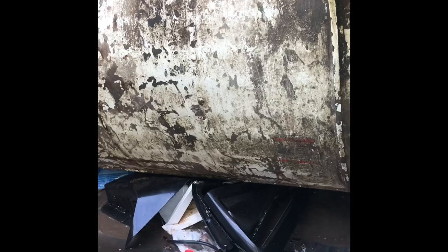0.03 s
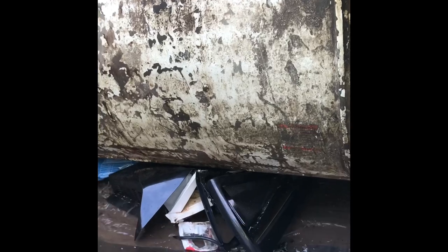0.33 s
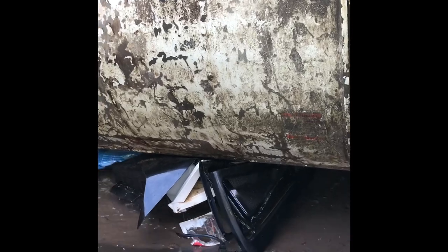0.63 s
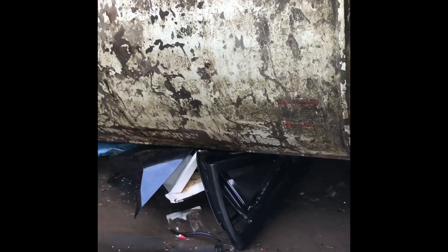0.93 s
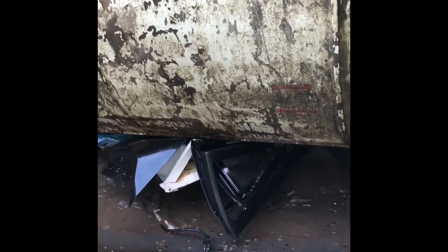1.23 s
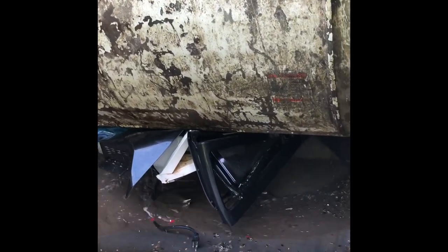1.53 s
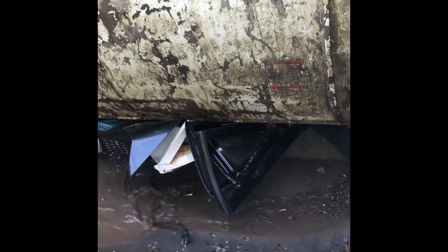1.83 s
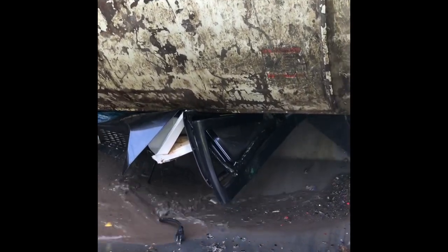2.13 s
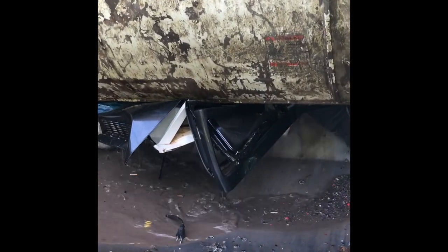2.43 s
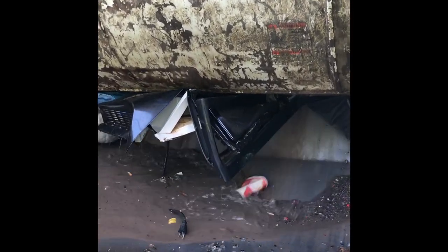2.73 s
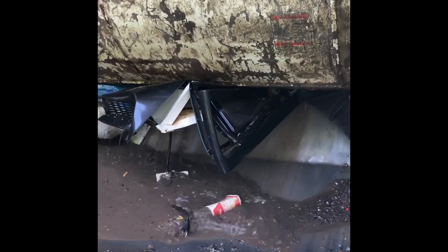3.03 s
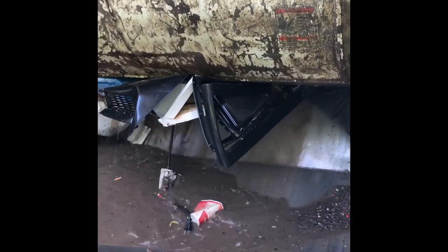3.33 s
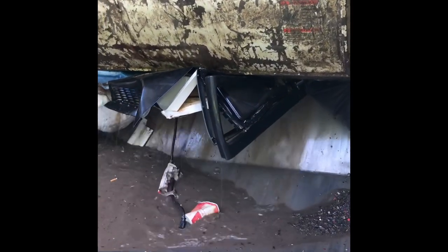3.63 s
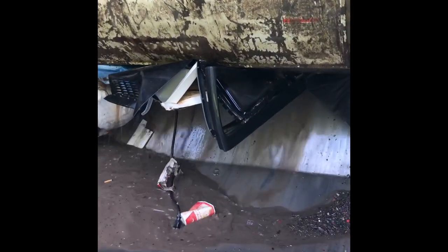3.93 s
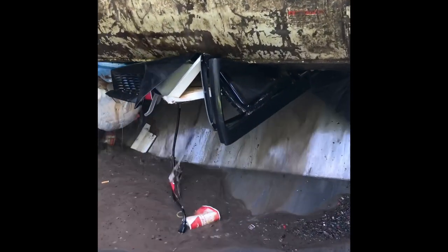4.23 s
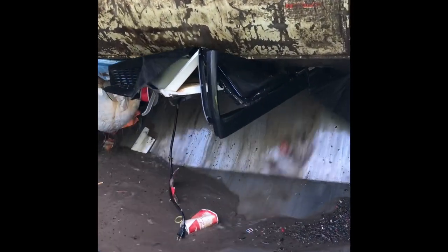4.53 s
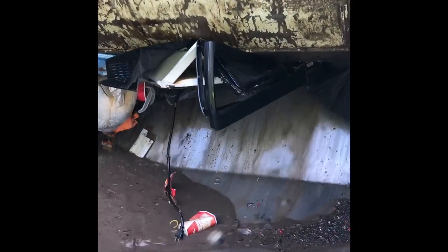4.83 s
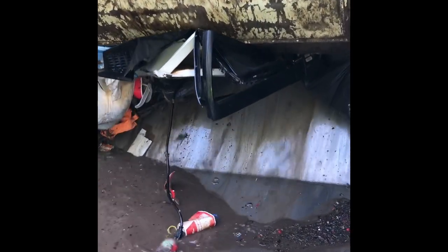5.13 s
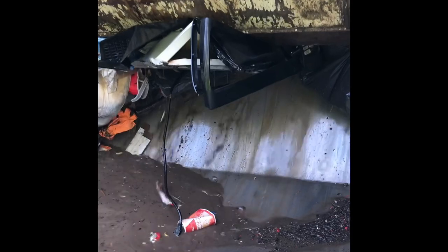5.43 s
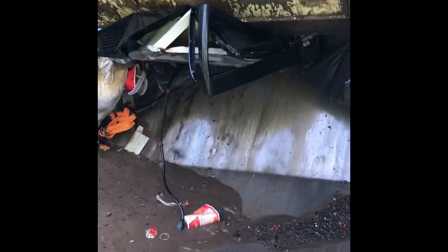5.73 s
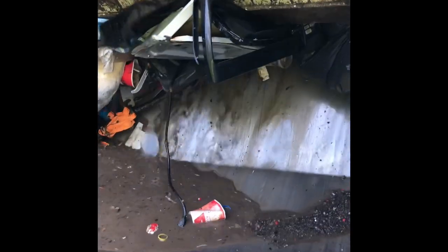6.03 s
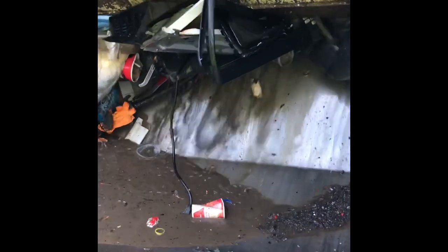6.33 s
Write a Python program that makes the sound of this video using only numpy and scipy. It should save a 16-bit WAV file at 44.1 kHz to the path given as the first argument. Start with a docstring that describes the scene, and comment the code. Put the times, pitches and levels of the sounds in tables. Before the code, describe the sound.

A garbage truck idles, then revs with a hydraulic whine as its compactor crushes junk in two loud crunches with cracks and squeals.

```python
"""A garbage truck's diesel idles, then revs up to drive the whining hydraulic pump of its packer blade.
Oil hisses through the valves while junk scrapes over the steel hopper's floor and bags rustle.
Plastic and board give way in two loud crunches, showers of tiny fractures that rumble in the hopper;
a stiff panel snaps in the first. Around them come stick-slip squeals, brittle cracks and dull knocks."""
import sys
import numpy as np
from scipy import signal
from scipy.fft import rfft, irfft, next_fast_len
from scipy.io import wavfile

SR = 44100
rng = np.random.default_rng(int(sys.argv[2]) if len(sys.argv) > 2 else 0)


def wrap_up_sound(samples):
    """Save the sound to the file named by the first command line argument, as 16-bit audio."""
    columns = np.atleast_2d(samples).T
    # keep every value between -1 and 1, then stretch to whole-number steps
    tamed = np.clip(columns, -1, 1)
    steps = np.round(tamed * 32767).astype(np.int16)
    wavfile.write(sys.argv[1], SR, steps)


N = 281358
TIME = np.arange(N) / SR
START_S = 0.508   # the sound fades in here

# junk sliding over the floor: (time [s], rise [s], hold [s], t60 [s], scrape [dB], bag rustle [dB])
SLIDES = [(1.45, .04, 0.22, 11, -60, -80), (1.548, 0.058, 0.033, .12, -64, -51.5),
          (2.2, 0.26, .1, .5, -56, -61), (2.37, 0.11, 0.016, 0.061, -46.5, -46),
          (2.58, 0.17, 0.0032, 2.2, -41, -49), (3.294, 0.45, 0.39, 4, -44.5, -54),
          (3.68, 0.3, 0.01, .4, -53, -45), (3.695, 0.37, 0, 14, -45.5, -66),
          (5.304, 0.37, 0.089, 0.34, -47, -66.5), (6.0, .3, 0.021, 4, -48.5, -66),
          (6.157, 0.026, .1, .15, -52, -43)]
# spectrum of the steel hopper's rumble: (frequency [Hz], level [dB])
RUMBLE_COLOUR = [(20, -16), (60, -2), (130, 1.5), (220, -1.5), (320, 0), (420, 1), (540, 0), (680, 3),
                 (900, -2.5), (1250, -6.5), (1450, -14.5), (1900, -30), (4000, -38), (16000, -68)]


def from_db(db):
    """Decibels to gain."""
    return 10 ** (np.asarray(db) / 20)


def rms_one(x):
    """Scale to unit power."""
    return x / np.sqrt(np.mean(x ** 2) + 1e-20)


def together(levels):
    """Level of unrelated sounds heard at once: their powers add."""
    return np.sqrt(sum(level ** 2 for level in levels))


def white():
    """White noise."""
    return rng.standard_normal(N)


def drift(rate_hz):
    """Smooth random wobble with a spread of about 1."""
    r = np.exp(-80 * np.pi * rate_hz / SR)
    slow = signal.lfilter([1], [1, -2 * r, r * r], rng.standard_normal(N // 40 + 2002))[2000:]
    return np.interp(np.arange(N) / 40, np.arange(len(slow)), rms_one(slow))


def grains(per_s, spread_db):
    """Random tiny fractures: many small, a few large."""
    sizes = from_db(spread_db * np.minimum(rng.exponential(1, N), 4))
    return (rng.random(N) < per_s / SR) * sizes * rng.choice([-1, 1], N)


def eased(s, length_s):
    """A move from 0 to 1 that starts briskly and levels off."""
    return np.sin(np.pi / 2 * np.clip((TIME - s) / length_s, 0, 1))


def swell(s, rise_s, hold_s, t60):
    """Envelope that gains 20 dB per rise time up to 1 at time s, holds, and dies away."""
    early, late = np.maximum(s - TIME, 0), np.maximum(TIME - s - hold_s, 0)
    return np.exp(np.maximum(-np.log(10) * early / rise_s - np.log(1000) * late / t60, -20))


def dying(s, t60):
    """Envelope that jumps to 1 at time s and decays for up to half a second."""
    out, at = np.zeros(N), round(s * SR)
    age = TIME[:min(SR // 2, N - at)]
    out[at:at + len(age)] = np.exp(-np.log(1000) * age / t60)
    return out


def coloured(x, spectrum):
    """EQ a sound with a curve of (frequency [Hz], level [dB]) points; rms 1."""
    hz, db = np.transpose(spectrum)
    size = next_fast_len(N)
    bins = np.maximum(np.fft.rfftfreq(size, 1 / SR), 1)
    gain = from_db(np.interp(np.log(bins), np.log(hz), db))
    return rms_one(irfft(rfft(x, size) * gain, size)[:N])


def band(x, low_hz, high_hz):
    """Gentle band-pass; rms 1."""
    return rms_one(signal.sosfilt(signal.butter(2, [low_hz, high_hz], "band", fs=SR, output="sos"), x))


def resonance(x, hz, width_hz):
    """A resonance with gain 1 at its peak."""
    r, w = np.exp(-np.pi * width_hz / SR), 2 * np.pi * hz / SR
    return signal.lfilter(np.array([1, 0, -1]) * (1 - r * r) / 2, [1, -2 * r * np.cos(w), r * r], x)


def ring(clicks, hz, t60):
    """Each click sets a decaying sine of its own height ringing."""
    r, w = from_db(-60 / (t60 * SR)), 2 * np.pi * hz / SR
    return signal.lfilter([0, np.sin(w)], [1, -2 * r * np.cos(w), r * r], clicks + 1e-18)


def wall_echoes(x, wall_db):
    """Three early reflections from the hopper's floor and sides."""
    out = x.copy()
    for k, lag_s in enumerate((.0036, .0067, .0113)):
        lag = round(lag_s * SR)
        out[lag:] += from_db(wall_db - 2 * k) * x[:-lag]
    return out


def steel_walls(x, wet_db):
    """Standing waves between close steel walls give bright sounds a fine metallic grain; rms 1."""
    echoes = (white() * dying(.002, t60=.06))[:SR // 8]
    return rms_one(x + from_db(wet_db) * signal.fftconvolve(x, echoes / np.linalg.norm(echoes))[:N])


def in_hopper(x, wet_db, t60):
    """Reflections between the steel walls smear each sound into a dying hiss."""
    r = from_db(-120 / (t60 * SR))
    energy = signal.lfilter([1 - r], [1, -r], x * x + 1e-18)
    return x + from_db(wet_db) * np.sqrt(energy) * white()


def engine():
    """Diesel and pump share one shaft: tones, clatter and oil flow follow its speed."""
    # engine, pump and gear tones: (order [cycles per turn], idle level [dB], working level [dB])
    orders = [(3, -43.5, -43), (6, -65, -47), (15 / 2, -58, -46.5), (13, -45.5, -57.5), (43 / 4, -73, -40),
              (20, -44.5, -41.5), (57 / 2, -66, -49), (30, -75, -46.5), (40, -67, -53), (50, -63, -53.5),
              (60, -65, -61.5)]
    # spectrum of the idle clatter: (frequency [Hz], level [dB])
    clatter_colour = [(20, -17), (90, 5), (200, -1), (420, -5.5), (530, -10), (620, -4), (800, -10),
                      (1100, -7.5), (1500, -20.5), (2600, -24), (3050, -20), (4900, -27), (6000, -22.5),
                      (7800, -34.5), (11000, -37.5), (16000, -41)]
    # spectrum of the roar at working speed: (frequency [Hz], level [dB])
    roar_colour = [(20, -14), (45, -2), (70, 0.5), (160, 1), (330, -5.5), (480, -3.5), (750, -6),
                   (1200, -10), (1600, -19.5), (2600, -24), (6000, -31.5), (16000, -71)]
    # the pump's main tone under load: (time [s], level [dB])
    pump_effort = [(2.7, -48), (2.8, -29.5), (2.98, -23.5), (3.02, -33), (3.06, -23.5), (3.22, -31),
                   (3.28, -24), (3.42, -31.0), (3.58, -20.3), (3.88, -35), (3.98, -25.5), (4.56, -33.8),
                   (4.64, -31), (4.9, -42.5), (5.06, -23.5), (5.2, -25), (5.22, -36), (5.26, -29.5),
                   (5.76, -31.7), (6.34, -24)]
    idle_hz, work_hz, relief_hz = 11.67, 22.42, 0.179   # crank speeds, and the rise as the load eases
    pump_order = 10   # pump teeth per turn

    revved = eased(2.73, length_s=1.08)   # the throttle opens
    gathering = np.sin(np.pi * revved)   # peaks mid-rev, where speed and level are least steady
    crank_hz = idle_hz + (work_hz - idle_hz) * revved + relief_hz * eased(5.3, length_s=0.31)
    waver = 1 + (.0015 + .008 * gathering) * drift(9.1)
    turn = 2 * np.pi * np.cumsum(crank_hz * waver) / SR

    # the whine starts a little louder, settles, then takes up the load
    resting_db = -36 + 2.5 * np.exp(-np.maximum(TIME - START_S, 0) / 0.32)
    effort_db = np.interp(TIME, *np.transpose(pump_effort)) + 2 * gathering * drift(17)
    working = eased(2.4, length_s=.3)
    pump_db = (1 - working) * resting_db + working * effort_db
    # under acceleration the cylinders pull unevenly: one throb per engine cycle of two turns
    throb = 1 + 0.19 * gathering * np.cos(turn / 2)
    tones = from_db(pump_db) * throb * np.sin(pump_order * turn)

    # one surge of oil pressure swells the pump's shrill overtones
    surge_db = 20 * np.log10(1 + 1.9 * swell(4.6, rise_s=.12, hold_s=0, t60=1.1))
    mid_rev_db = -20 * revved * (1 - revved)
    for order, idle_db, work_db in orders:
        shrill = order >= 4 * pump_order
        dips = shrill or order % pump_order != 0   # the pump's first two overtones hold up mid-rev
        level_db = idle_db + revved * (work_db - idle_db + 2.0 * drift(4.7))
        level_db += shrill * surge_db + dips * mid_rev_db
        tones += from_db(level_db) * np.sin(order * turn + rng.uniform(0, 2 * np.pi))

    # six cylinders fire three times a turn; each firing rattles the block
    firing = 1 + .14 * np.cos(3 * turn) + .15 * np.cos(6 * turn)
    clatter = from_db(-47) * coloured(wall_echoes(white(), wall_db=-18.5), clatter_colour) * firing
    # the flow pulses with every tooth of the pump and twice a turn with the shaft
    ripple = 1 + 0.078 * np.cos(pump_order * turn) + 0.059 * np.cos(2 * turn)
    roar = from_db(-36 + 0.25 * drift(21)) * revved ** 0.43 * coloured(white(), roar_colour)
    return np.sqrt(2) * tones + clatter + (roar + scrape_and_oil(revved)) * ripple


def squeals():
    """Stick-slip gives gliding whistles: nearly pure under a firm grip, ragged under a light one."""
    # plastic slipping on steel:
    # (time [s], length [s], start pitch [Hz], end pitch [Hz], level [dB], overtone gain [dB])
    slips = [(1.268, 0.059, 4600, 3780, -61, -7), (1.44, .16, 7550, 7400, -63, -6),
             (1.62, .3, 5150, 4900, -65, -12), (2.529, 0.074, 5390, 5355, -33.5, 10.5),
             (2.555, 0.051, 4950, 5040, -29, 12.5), (2.577, .115, 4918, 4885, -22, 5),
             (2.64, 0.062, 4770, 4690, -25.5, -1.5), (2.698, 0.056, 4840, 4770, -39.5, 8),
             (3.044, 0.11, 8600, 8950, -54, -.5), (3.611, 0.045, 3560, 3780, -43, -3),
             (3.672, 0.075, 2335, 2320, -40, -4), (5.02, .04, 4600, 4750, -33, -12),
             (5.05, 0.081, 4800, 4800, -37, -12), (5.045, .035, 6021, 6021, -23, -16),
             (5.069, .052, 6021, 6021, -20, -16), (5.12, .045, 6025, 6020, -34, -16),
             (5.166, 0.05, 3820, 3890, -34, -4)]
    # a squeal's overtones: (multiple of the pitch, relative level [dB])
    harmonics = [(2, -14.5), (3, -23)]
    attack_s, release_s, fade_db = 0.0068, .003, 15.5
    waver, flutter_db = 0.0031 * drift(190), 2.0 * drift(90)
    out = np.zeros(N)
    for s, length, first_hz, last_hz, db, overtones_db in slips:
        on = (TIME > s) & (TIME < s + length)
        age = TIME[on] - s
        level_db = db - fade_db * (age / length) ** 2   # fades ever faster as the pressure goes
        ragged = np.interp(level_db, [-42, -26], [3, .6])
        hz = first_hz + (last_hz - first_hz) * age / length
        phase = 2 * np.pi * np.cumsum(hz * (1 + ragged * waver[on])) / SR
        grip = np.clip(np.minimum(age / attack_s, (length - age) / release_s), 0, 1)
        overtones = sum(from_db(overtones_db + k_db) * np.sin(k * phase)
                        for k, k_db in harmonics if k * first_hz < SR / 2)
        out[on] += np.sqrt(2) * grip * from_db(level_db + flutter_db[on]) * (np.sin(phase) + overtones)
    return wall_echoes(out, wall_db=-13.5)


def scrape_and_oil(revved):
    """One hiss for grit dragged over the steel floor and for valve oil, which rises with the revs."""
    # spectrum of the hiss: (frequency [Hz], level [dB])
    hiss_colour = [(300, -27), (1500, -2), (2600, -4), (3100, 2), (3600, 1), (4050, 2), (5400, -1.5),
                   (6100, 0.5), (6700, -1.5), (8000, -3), (9500, -1.5), (11000, -6), (12300, -5.5),
                   (16000, -10)]
    scraping = [from_db(db) * swell(s, rise, hold, t60) for s, rise, hold, t60, db, _ in SLIDES]
    oil = from_db(-47.5) * revved
    grit = from_db(-3 + 3.6 * drift(18)) * rms_one(grains(per_s=2500, spread_db=1.5))
    rush = steel_walls(white() + grit, wet_db=-11)
    flicker = from_db(1.1 * drift(12))
    return together([oil, *scraping]) * flicker * coloured(rush, hiss_colour)


def crunching():
    """Showers of fractures splinter brightly and shake the hopper; bags rustle as the junk slides."""
    # the load giving way: (time [s], rise [s], t60 [s], rumble [dB], splintering [dB])
    crunches = [(2.045, 0.1, 0.53, -40, -60), (2.418, .006, 2.4, -28, -41.5),
                (2.47, 0.021, 0.55, -15, -18.5), (2.6, .05, 1.3, -39, -37),
                (2.775, 0.069, 0.93, -29.5, -35.5), (2.865, 0.08, .5, -30, -38.5),
                (2.954, 0.064, 0.48, -32, -38.5), (3.0, .4, 9.2, -36.5, -55), (3.3, 0.31, 3.2, -39.5, -51),
                (3.68, 0.09, 0.47, -34.5, -37), (4.37, 0.3, 0.78, -41, -44.5), (5.01, 0.06, .7, -16.5, -23),
                (5.095, 0.024, .8, -18.5, -25), (5.175, 0.043, 0.47, -19, -28),
                (5.228, 0.044, 0.33, -18, -42), (5.445, 0.045, 0.36, -29.5, -40), (5.5, .3, 7, -39, -62)]
    # spectrum of the splinters: (frequency [Hz], level [dB])
    splinter_colour = [(500, -4), (1300, 2), (1900, 2.5), (2800, -1.5), (3900, -1), (5200, -5.5),
                       (7000, -5), (10000, -9.5), (16000, -21)]
    splinter_share = 0.58   # splintering dies in this share of the rumble's time
    shaking = together(from_db(db) * swell(s, rise, 0, t60) for s, rise, t60, db, _ in crunches)
    splitting = together(from_db(db) * swell(s, rise, 0, splinter_share * t60)
                         for s, rise, t60, _, db in crunches)
    rustling = together(from_db(db) * swell(s, rise, hold, t60) for s, rise, hold, t60, _, db in SLIDES)
    rumble = coloured(in_hopper(grains(per_s=900, spread_db=3), wet_db=-1, t60=0.28), RUMBLE_COLOUR)
    fractures = in_hopper(grains(per_s=1400, spread_db=3), wet_db=1, t60=0.035)
    splinters = coloured(steel_walls(fractures, wet_db=-6.5), splinter_colour)
    bags = band(in_hopper(grains(per_s=2300, spread_db=2), wet_db=5, t60=0.021), 5700, 14400)
    # light grinding barely moves the heavy walls, so it has less low end
    highs = signal.sosfiltfilt(signal.butter(2, 480, "high", fs=SR, output="sos"), rumble)
    low_gain = np.clip(from_db(-4.5) + shaking / from_db(-24.5) / 2, 0, 1)
    return shaking * (highs + low_gain * (rumble - highs)) + splitting * splinters + rustling * bags


def cracks():
    """Each crack is a tight run of fractures that dies away; a bright one has more top and less body."""
    # brittle breaks: (time [s], level [dB], brightness [dB], t60 [s])
    breaks = [(1.541, -50.5, 11, 0.025), (1.602, -49.5, 7, 0.033), (1.765, -48.5, 5, 0.028),
              (2.427, -41.5, 1, 0.11), (2.74, -38, -2.5, 0.087), (2.776, -36, 0.5, 0.094),
              (2.871, -32, -2, 0.088), (2.968, -40.5, -1, 0.15), (3.027, -38, 2, .03),
              (3.121, -43, -2.5, 0.11), (3.191, -38, -0.5, 0.12), (3.508, -32.5, 1, 0.064),
              (3.574, -35.5, 0.5, 0.071), (3.671, -38.5, -4.5, 0.066), (3.693, -38.5, 10, 0.042),
              (4.481, -34.5, 0, 0.093), (4.501, -42.5, -8, 0.046), (4.779, -40.5, -0.5, 0.059),
              (5.087, -27.5, -3, 0.096), (5.188, -34, -2, .03), (5.247, -35.5, -8, 0.03),
              (5.384, -43, 0, .085), (5.452, -46, 0, .08), (5.615, -46, -1, .08), (5.815, -40, 3, .08),
              (5.894, -43.5, -3, 0.092), (5.944, -29.5, -2, 0.068)]
    tearing = steel_walls(grains(per_s=14000, spread_db=2.5), wet_db=-8.5)
    body, edge, top = band(tearing, 760, 2820), band(tearing, 3530, 6600), band(tearing, 8400, 13400)
    bursts = np.zeros(N)
    for s, db, bright_db, t60 in breaks:
        timbre = from_db(1.5 - bright_db) * body + from_db(3.5) * edge + from_db(1 + bright_db) * top
        bursts += from_db(db) * dying(s, t60) * timbre
    return wall_echoes(bursts, wall_db=-19.5)


def knocks():
    """Each blow strikes every hopper mode with a strength of its own; the truck's body booms below."""
    # dull blows on the hopper: (time [s], level [dB])
    blows = [(2.411, -26), (2.48, -12), (2.5, -12.5), (2.666, -18.5), (2.768, -21), (2.835, -18.5),
             (2.87, -15), (3.12, -15.5), (3.329, -25), (4.373, -27), (4.5, -19.5), (5.006, -11),
             (5.018, -5.5), (5.111, -11), (5.169, -16), (5.181, -10), (5.212, -13), (5.289, -31),
             (5.325, -15), (5.432, -18.5), (5.455, -21), (5.8135, -12.5)]
    # the hopper's modes: (frequency [Hz], level [dB], t60 [s])
    hopper_modes = [(125, -17, .12), (254, -26, 0.15), (396, -28, .04), (560, -12, 0.031), (660, -4, 0.028),
                    (965, -4, 0.019), (1240, -11, 0.026)]
    # the body lurching as the load lets go: (time [s], level [dB], t60 [s])
    lurches = [(2.47, -22, 0.6), (2.491, -19, 0.23), (5.0, -27, 0.9), (5.17, -20, 0.83)]
    times, blow_db = np.transpose(blows)
    scatter_db = rng.normal(-2, 2.3, (len(blows), len(hopper_modes)))
    rings = np.zeros(N)
    for k, (hz, db, t60) in enumerate(hopper_modes):
        clicks = np.zeros(N)
        clicks[np.round(times * SR).astype(int)] = from_db(blow_db + db + scatter_db[:, k])
        rings += ring(clicks, hz, t60)
    thuds = signal.sosfilt(signal.butter(2, [160, 1100], "band", fs=SR, output="sos"), rings)
    # the air in the hollow hopper keeps sounding after each blow
    hollow = from_db(-11.5) * coloured(white(), RUMBLE_COLOUR) + from_db(-12.5) * band(white(), 615, 797)
    tails = sum(from_db(db) * dying(s, t60=0.11) for s, db in blows) * hollow
    boom = sum(from_db(db) * dying(s, t60) for s, db, t60 in lurches) * band(white(), 35, 182)
    return wall_echoes(thuds, wall_db=-9.5) + tails + boom


def panel_snap():
    """A fracture races through a stiff panel and drives its modes; the sharpest ring on."""
    # the fracture's bursts: (time [s], level [dB], t60 [s])
    bursts = [(2.463, -3, 0.0323), (2.479, -23, 0.15)]
    # the panel's modes: (frequency [Hz], width [Hz], level [dB])
    panel_modes = [(2880, 300, -27), (3750, 110, 0), (4260, 170, 0), (4610, 170, 2), (5000, 150, -1),
                   (5800, 270, -3), (6400, 260, -6), (10500, 9300, -21)]
    tearing = white() * sum(from_db(db) * dying(s, t60) for s, db, t60 in bursts)
    snap = sum((-1) ** k * from_db(db) * resonance(tearing, hz, width)
               for k, (hz, width, db) in enumerate(panel_modes))
    sharpest = sum(from_db(db) * np.sin(2 * np.pi * hz * TIME) for hz, _, db in panel_modes[1:-1])
    ring_out = dying(bursts[0][0], t60=0.16) * sharpest
    return from_db(13) * snap + from_db(-22) * ring_out


def scene():
    """The truck and its load in mono, heard from the hopper's mouth."""
    return (engine() + crunching() + cracks() + panel_snap() + knocks() + squeals())[None]


def record(dry):
    """A quick fade-in, hard clipping on the loudest peaks and a steep high cut."""
    fade_in = np.clip((TIME - START_S) / 0.0066, 0, 1)
    clipped = np.clip(dry * fade_in, -.85, .85)
    return signal.sosfilt(signal.ellip(12, .1, 90, 15900, fs=SR, output="sos"), clipped)


dry = scene()
out = record(dry)
wrap_up_sound(out)
```